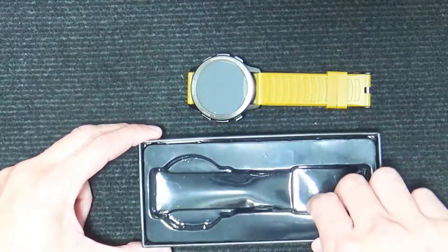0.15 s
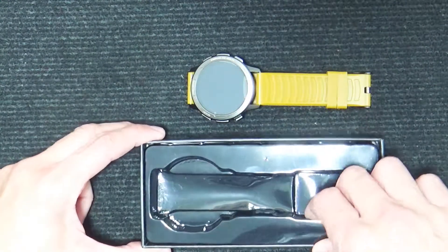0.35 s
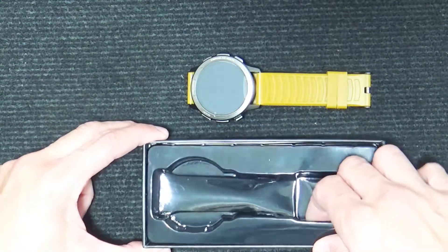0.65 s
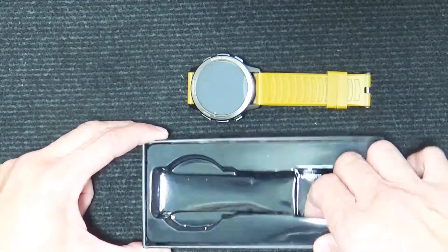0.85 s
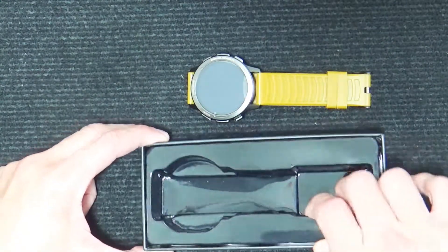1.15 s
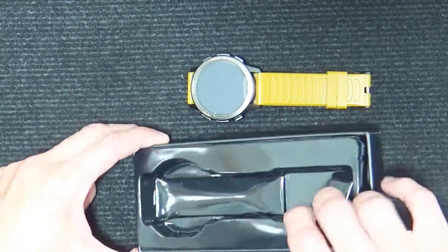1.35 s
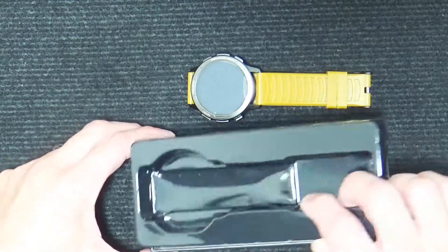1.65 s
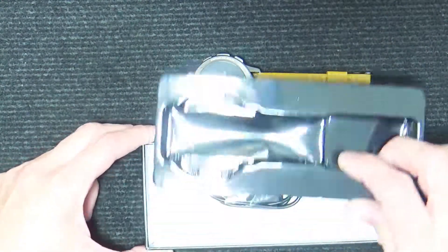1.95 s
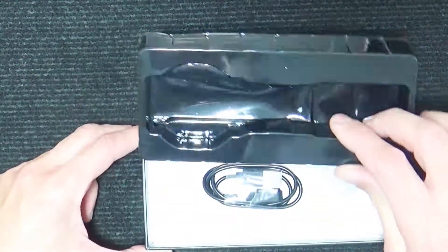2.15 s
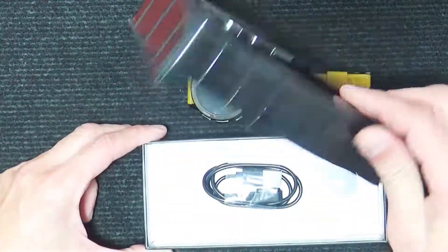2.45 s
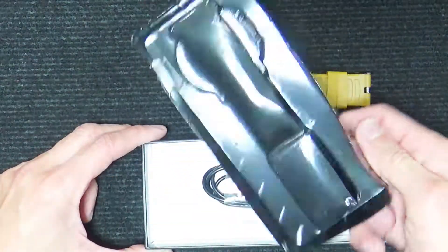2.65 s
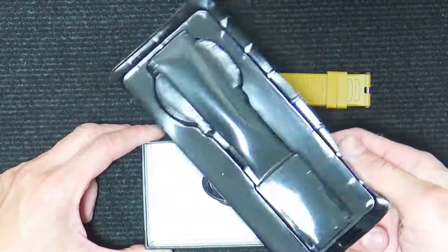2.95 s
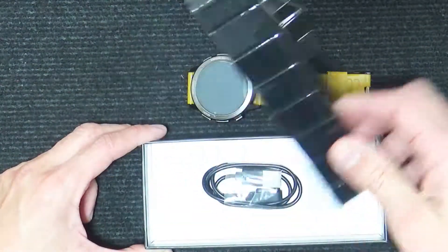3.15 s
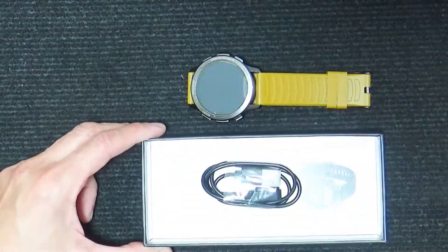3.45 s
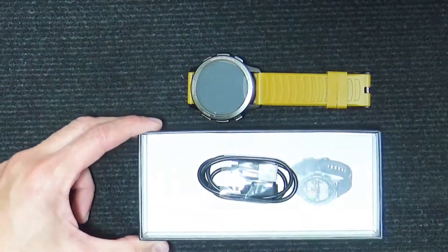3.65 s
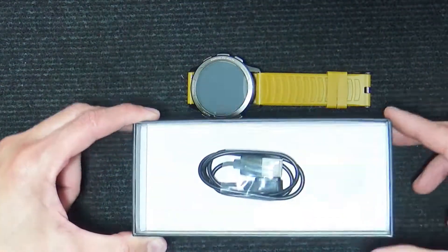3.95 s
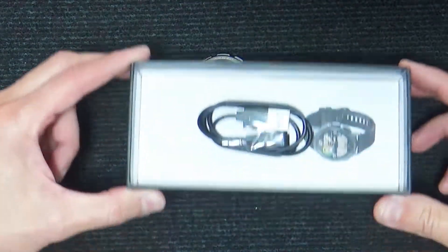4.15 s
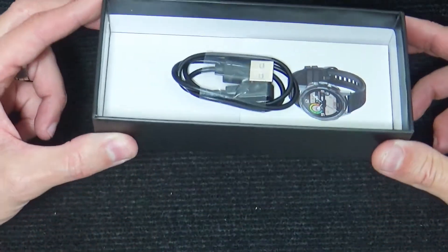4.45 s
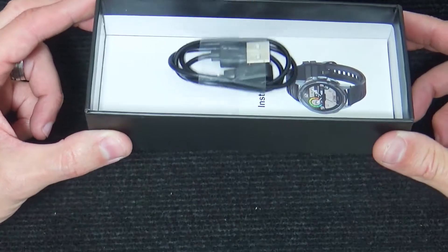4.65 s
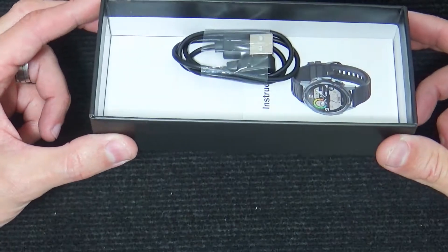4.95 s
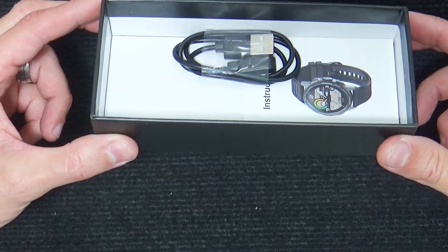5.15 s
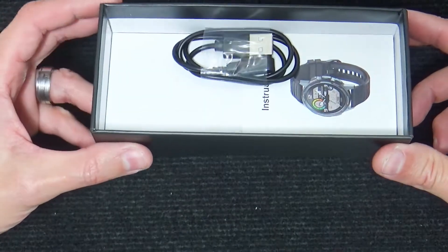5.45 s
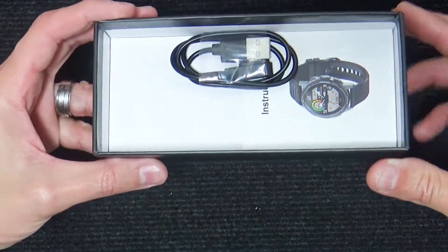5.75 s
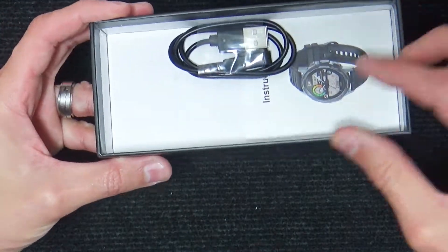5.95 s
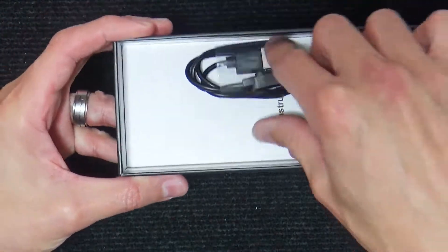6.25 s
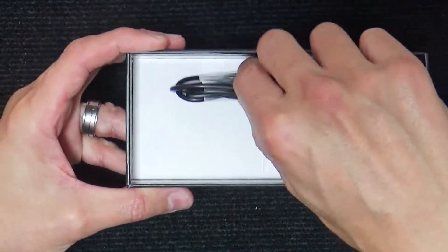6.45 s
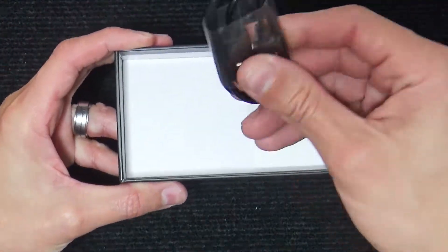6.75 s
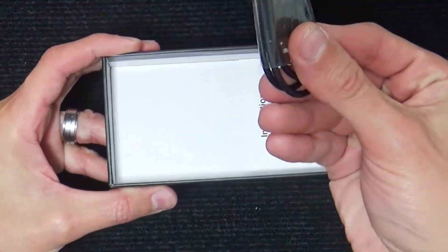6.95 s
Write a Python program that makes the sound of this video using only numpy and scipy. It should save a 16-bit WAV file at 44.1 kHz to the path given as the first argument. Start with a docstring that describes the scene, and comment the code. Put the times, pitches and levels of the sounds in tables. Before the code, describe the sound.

A close stereo microphone hears flimsy plastic crackling, groaning and rasping as it is worked out of a tight box, ending in several bright loud pops. After a pause the light tray lands with a brief double knock and scuff. Then come sparse, much quieter fingertip swishes, a tap on the box, a faint skin squeak, and a few crisp clicks of a cable, in a small, slightly lively room.

```python
"""In a small room, close to the microphone, a thin plastic tray is worked out of a cardboard box.
Filtered bursts make its buckling snaps; click trains and friction grains make its rim chatter and scrape.
It pops free and is dropped aside, ringing in a handful of decaying modes.
Then fingers slide over the box in filtered hiss and pick out a coiled cable with a few light clicks."""
import sys
import numpy as np
from scipy import signal
from scipy.io import wavfile
from scipy.ndimage import uniform_filter1d

SR = 44100
rng = np.random.default_rng(int(sys.argv[2]) if len(sys.argv) > 2 else 0)


def transcribe(u):
    """Save the signal u as a 16-bit wav file named by the first command-line argument.

    u: samples, shape (n,) or (channels, n), limited to [-1, 1]; the rate is SR.
    q: integer samples, one column per channel.
    """
    v = np.clip(np.atleast_2d(u).T, -1, 1)
    q = np.round(v * 32767).astype(np.int16)
    wavfile.write(sys.argv[1], SR, q)


N = 313551
TIME = np.arange(N) / SR

# a snap's colour is an arch over log frequency, centred here; also the middle pitch of the rim's patches
COLOUR_PIVOT_HZ = 2500
# a flipping patch's own resonance: its height, and its width as a share of its pitch
PATCH_DB, PATCH_WIDTH = 9.5, .2

# resonances of the open box: (frequency [Hz], width [Hz], rise [dB])
BOX = [(330, 120, 7.5), (1060, 490, 6), (3230, 1400, 11), (9170, 3700, 12)]
# modes of the whole tray: (frequency [Hz], relative level [dB], t60 [s])
TRAY_MODES = [(149, -22, .08), (320, -4.5, .13), (521, -4, .11), (561, -4, .11), (691, -2.5, .11),
              (799, -10, .09), (851, -6, .09), (1419, -9, .07)]
# spectrum of the groaning tray walls: (frequency [Hz], relative level [dB])
GROAN = [(60, -29.5), (150, -9), (320, 2.5), (600, 1), (1050, 2), (1600, -5), (2500, -2), (4000, -18.5),
         (9000, -50)]
# spectrum of the rasping tray rim: (frequency [Hz], relative level [dB])
RASP = [(200, -20.5), (1000, 5.5), (2800, 4.5), (5000, -0.5), (9000, 3), (12000, -5), (16000, -15.5)]
# level of the side sound, narrow in the lows and treble, widest in between: (frequency [Hz], level [dB])
SIDE_WIDTH = [(100, -26), (400, -14), (1400, -7), (5500, -7), (9000, -18.5), (14000, -26.5)]


def amp(db):
    """Decibels to gain."""
    return 10 ** (np.asarray(db) / 20)


def unit(x):
    """Scales to rms 1."""
    return x / np.sqrt(np.mean(x ** 2) + 1e-20)


def blow(x):
    """Scales a short sound to the energy of 5 ms at rms 1."""
    return x / np.sqrt(np.sum(x ** 2) / (.005 * SR) + 1e-20)


def read(points, hz):
    """Reads a spectrum table on a log-frequency axis."""
    f, value = np.transpose(points)
    return np.interp(np.log(hz + 1), np.log(f + 1), value)


def add(mix, s, sound):
    """Mixes a sound in at s seconds."""
    part = mix[max(round(s * SR), 0):][:len(sound)]
    part += sound[:len(part)]


def body(spectrum, peaks=(), size=4096):
    """Causal (minimum-phase) impulse response of a broad spectrum with resonances standing on it."""
    hz = np.fft.rfftfreq(size, 1 / SR)
    db = read(spectrum, hz)
    for f, width, rise in peaks:
        db = db + rise / (1 + ((hz - f) / (width / 2)) ** 2)
    log_gain = np.log(amp(np.r_[db, db[-2:0:-1]]))
    return np.fft.ifft(np.exp(np.conj(signal.hilbert(log_gain)))).real


def through(x, response):
    """Passes x through an impulse response."""
    return signal.fftconvolve(x, response)[:len(x)]


def ring(modes, size=16384):
    """A hollow body's answer to one blow; neighbouring modes swing in opposite directions."""
    t, out = np.arange(size) / SR, np.zeros(size)
    for k, (hz, db, t60) in enumerate(modes):
        out += (-1) ** k * amp(db - 60 * t / t60) * np.sin(2 * np.pi * hz * t)
    return out


def grains(per_s, spread_db):
    """Friction as tiny random slips of very unequal size."""
    size = amp(spread_db * np.minimum(rng.exponential(1, N), 4))
    happens = rng.random(N) < per_s / SR
    return rng.standard_normal(N) * size * happens


def burst(ring_s, slow_s, crack_s=0.00005, size=2048):
    """One flip: a brief, nearly white rattle whose low bending waves arrive late (slow_s at 1 kHz)."""
    t, hz = np.arange(size) / SR, np.fft.rfftfreq(size, 1 / SR)
    rattle = rng.standard_normal(size) * (1 - np.exp(-t / crack_s)) * np.exp(-t / ring_s)
    z = np.fft.rfft(rattle)
    z /= abs(z) ** .4  # evens out the spectrum
    bending_delay = np.exp(-4j * np.pi * slow_s * np.sqrt(1000 * hz))
    return np.fft.irfft(z * bending_delay)[:size // 2]


def clicks(rows, peaks, ring_s, slow_s, room_db, room_peaks):
    """Each flip sends a burst through the sheet and the patch's own resonance.
    Returns what goes to the microphone and what goes to the room, where the resonances
    of all directions partly even out. ring_s is for a patch at the colour pivot."""
    # spectrum of a snap: (frequency [Hz], relative level [dB])
    top = [(100, -18), (300, -2.5), (700, 7), (9500, 2.5), (12000, 1), (16000, -18.5)]
    low_shelf_db = -13.5  # how weakly a small patch radiates below its low edge
    ring_growth = 0.12  # exponent: bigger, lower patches rattle for longer
    near, far = np.zeros(N), np.zeros(N)
    hz = np.geomspace(50, 16000, 60)
    octave = np.log2(np.maximum(hz, 300) / COLOUR_PIVOT_HZ)
    low_cut = signal.butter(3, 220, "high", fs=SR, output="sos")
    for s, db, tilt_db, focus_db, patch_hz, edge_hz in rows:
        resonances = peaks + [(patch_hz, PATCH_WIDTH * patch_hz, PATCH_DB)]
        shelf = np.maximum(-10 * np.log10(1 + (edge_hz / hz) ** 10), low_shelf_db)
        # tilt makes it bright or dull, focus narrows it to one register
        colour = read(top, hz) + tilt_db * octave - focus_db * octave ** 2 + shelf
        colour = np.c_[hz, np.maximum(colour - colour.max(), -70)]
        patch_ring_s = ring_s * (COLOUR_PIVOT_HZ / patch_hz) ** ring_growth
        direct = through(body(colour, resonances), burst(patch_ring_s, slow_s))
        add(near, s, amp(db) * blow(signal.sosfilt(low_cut, direct)))
        evened = [(f, width, room_peaks * rise) for f, width, rise in resonances]
        add(far, s, amp(db + room_db) * blow(signal.sosfilt(low_cut, body(colour, evened))))
    return np.array([near, far])


def creaks(rows, width_hz, rough, edge=.5):
    """Uneven slips keep one resonance going while its pitch glides."""
    out = np.zeros(N)
    pole = np.exp(-np.pi * width_hz / SR)
    for start, end, first_hz, last_hz, db in rows:
        size = round((end - start) * SR)
        phase = 2 * np.pi * np.cumsum(np.geomspace(first_hz, last_hz, size)) / SR
        slow_noise = signal.lfilter([1], np.poly([pole, pole]), rng.standard_normal((2, SR // 4)))
        a, b = unit(slow_noise)[:, -size:]
        tone = (1 + rough * a) * np.cos(phase) + rough * b * np.sin(phase)
        add(out, start, amp(db) * unit(tone) * signal.windows.tukey(size, edge))
    return signal.sosfilt(signal.butter(4, 200, "high", fs=SR, output="sos"), out)


def floor():
    """Steady filtered hiss with the room's low resonances."""
    # spectrum of the hiss: (frequency [Hz], relative density [dB])
    hiss_colour = [(12, -39.5), (20, -8), (113, -3.5), (172, -8.5), (234, -3), (620, 1), (1060, -2.5),
                   (2460, -9), (3440, -10), (4180, -13), (14700, -18.5), (16000, -24)]
    # low resonances of the room: (frequency [Hz], width [Hz], rise [dB])
    hum = [(50, 15, 8), (132, 30, 10.5), (326, 11, 10)]
    return amp(-67.5) * unit(through(rng.standard_normal(N), body(hiss_colour, hum, size=16384)))


def rumble():
    """A faint low rumble of filtered noise under the handling."""
    # stronger while the tray is handled: (time [s], level [dB])
    levels = [(0, -65.5), (2.0, -69), (3.55, -67.5), (3.9, -73.5)]
    # spectrum: (frequency [Hz], relative level [dB])
    colour = [(15, -17), (50, -6), (110, -3.5), (170, -16), (240, -2.5), (330, -17), (600, -37)]
    noise = unit(through(rng.standard_normal(N), body(colour, size=16384)))
    return amp(np.interp(TIME, *np.transpose(levels))) * noise


def whine(start=2.15, end=3.3, hz=3450, width_hz=200, pulses_per_s=21, db=-75):
    """A very faint, high, fluttering whine in the background: narrow-band noise in pulses."""
    out = np.zeros(N)
    t = TIME[:round((end - start) * SR)]
    band = unit(signal.lfilter(*signal.iirpeak(hz, hz / width_hz, SR), rng.standard_normal(len(t))))
    flutter = .5 + .5 * np.sin(np.pi * pulses_per_s * t) ** 2
    add(out, start, amp(db) * band * flutter * signal.windows.tukey(len(t), .5))
    return out


def scatter(delay_s=0.0043, decay_s=0.013, size=2048):
    """Hands, box and table scatter a sound into a quick spray of small echoes."""
    age = np.arange(size) / SR - delay_s
    h = rng.standard_normal(size) * (age > 0) * np.exp(-abs(age) / decay_s)
    return h / np.linalg.norm(h)


def tail(build_s=0.0021, size=28000):
    """Dense reflections of a small room, each band dying at its own speed."""
    # decay: (frequency [Hz], t60 [s])
    t60 = [(150, 0.13), (600, 0.65), (3000, 0.55), (9000, 0.41), (15000, 0.7)]
    # colour of the reflections: (frequency [Hz], relative level [dB])
    colour = [(100, -6), (350, 7.5), (1000, -0.5), (5500, -1.5), (12000, -6), (16000, -9)]
    hz, t, z = signal.stft(rng.standard_normal(size), SR, nperseg=256)
    decay = amp(-60 * t / read(t60, hz)[:, None])
    h = signal.istft(z * decay, SR, nperseg=256)[1]
    h *= 1 - np.exp(-(np.arange(len(h)) / SR / build_s) ** 2)
    return through(h / np.linalg.norm(h), body(colour))


def room(x, wet_db=-7, scatter_db=-9.5):
    """Near echoes and a tail as mid and side; the spray and the mid tail drift steadily
    between two random sets, one turn a second."""
    turn = 2 * np.pi * TIME
    first, second = np.cos(turn) * x, np.sin(turn) * x
    early = amp(scatter_db) * (through(first, scatter()) + through(second, scatter()))
    add(early, .0031, amp(-11) * x)  # echo off the table
    mid = np.cos(turn) * through(x, tail()) + np.sin(turn) * through(x, tail())
    side = through(through(x, tail()), body(SIDE_WIDTH))
    return early + amp(wet_db) * mid, amp(wet_db) * side


def fingers(edge=0.27, pivot_hz=7000, uneven_db=0.8):
    """Skin hisses on card; inside the box the air under the hand colours the hiss and rises in pitch."""
    # fingertips slide on card: (start [s], end [s], level reached if the growth ran on for half a stroke
    # more [dB], growth over the stroke [dB], share inside the box [0-1], brightness [dB per octave])
    strokes = [(4.607, 4.754, -53.5, 12.5, 0.03, -5), (5.316, 5.463, -65, 4.5, 0.1, -7.5),
               (5.537, 5.685, -59, 8, 0, -7), (5.917, 6.005, -56, 7, 0.8, -8.5),
               (6.128, 6.286, -64, 0.5, 0.7, -4), (6.317, 6.46, -53, 15, 0.1, -7.5),
               (6.486, 6.552, -49, 16, 0.3, 8)]
    # spectrum of skin on card: (frequency [Hz], relative level [dB])
    skin_colour = [(300, -50), (1500, -22.5), (3100, -2.5), (4500, -6.5), (7000, 4), (9500, 9.5),
                   (12500, -0.5), (16000, -25)]
    # air between hand and box, at mid-stroke and fully inside: (frequency [Hz], width [Hz], rise [dB])
    hollow = [(2500, 330, 10), (4550, 244, 9), (6440, 350, 12), (11100, 250, 12)]
    hollow_rise = .13  # share by which the air's pitch rises over a stroke as the gap closes
    grip = unit(uniform_filter1d(rng.standard_normal(N), size=500))
    friction = grains(per_s=29000, spread_db=4.5) * amp(uneven_db * grip)
    out = np.zeros(N)
    for start, end, db, growth_db, inside, tilt_db in strokes:
        skin = [(hz, level + tilt_db * np.log2(hz / pivot_hz)) for hz, level in skin_colour]
        x = friction[round(start * SR):round(end * SR)]
        progress, hiss = np.linspace(0, 1, len(x)), np.zeros(len(x))
        # cross-fade through six stages of the closing gap
        places, step = np.linspace(0, 1, 6, retstep=True)
        for place in places:
            bend = 1 + hollow_rise * (place - .5)
            air = [(hz * bend, width, inside * rise) for hz, width, rise in hollow]
            hiss += through(x, body(skin, air)) * np.maximum(1 - abs(progress - place) / step, 0)
        level = amp(db + growth_db * (progress - 1.5))
        add(out, start, unit(hiss) * level * signal.windows.tukey(len(x), edge))
    return out


def finger_squeaks():
    """A fingertip squeaks faintly on the card, its slips driving a gliding resonance very unevenly."""
    # (start [s], end [s], first pitch [Hz], last pitch [Hz], level [dB])
    squeaks = [(4.14, 4.27, 2670, 2820, -73), (5.94, 6.0, 2450, 2470, -70), (6.12, 6.34, 2630, 2980, -67)]
    return creaks(squeaks, width_hz=350, rough=1.0)


def box_taps():
    """Fingers tap the box: each tap clicks and leaves the box ringing briefly."""
    # (time [s], level [dB], tilt [dB per octave], focus [dB per octave squared],
    #  patch pitch [Hz], low edge [Hz], ring of the box [dB])
    taps = [(4.622, -56.5, -4.5, -0.53, 2560, 198, -62), (4.749, -39.5, -3.5, -1.04, 2820, 1900, -55.5),
            (6.268, -42, -2.5, -0.53, 960, 280, -56.5)]
    # modes of the box: (frequency [Hz], relative level [dB], t60 [s])
    modes = [(255, -7, .1), (328, -1, .11), (2980, -1, .06), (3340, -5, .1)]
    ringing = np.zeros(N)
    for s, *_, ring_db in taps:
        add(ringing, s, amp(ring_db) * ring(modes))
    rows = [row[:-1] for row in taps]
    return ringing + clicks(rows, BOX, ring_s=0.00067, slow_s=0.00098, room_db=-1, room_peaks=0.8)


def cable_clicks():
    """The cable and its plugs click as they are picked up, coloured by the open box."""
    # (time [s], level [dB], tilt [dB per octave], focus [dB per octave squared],
    #  patch pitch [Hz], low edge [Hz])
    rows = [(6.4045, -47.5, -8, 1.8, 1280, 260), (6.4436, -33.5, 0, 0.45, 1280, 920),
            (6.492, -52.5, -1, -0.5, 2600, 1520), (6.7022, -37, 0.5, -1.7, 7500, 1400),
            (6.7155, -39, 3, -0.24, 4380, 1760)]
    return clicks(rows, BOX, ring_s=0.0014, slow_s=0.00054, room_db=-1, room_peaks=0.22)


def landing(scuff_s=0.0079, thud_db=-7, size=2048):
    """The dropped tray rings, thuds and scuffs the cloth at each contact."""
    # the tray lands, rocks and settles: (time [s], ring [dB], scuff [dB])
    landings = [(3.488, -43, -45), (3.4955, -39.5, -41.5), (3.503, -48.5, -48), (3.513, -47.5, -69),
                (3.6105, -62, -52.5), (3.620, -52.5, -51), (3.637, -69, -55)]
    out, t = np.zeros(N), np.arange(size) / SR
    for s, ring_db, scuff_db in landings:
        contact = rng.standard_normal(size) * np.exp(-t / scuff_s)
        scuff = blow(through(contact, body(RASP)))
        thud = blow(through(contact, body(GROAN)))
        add(out, s, amp(ring_db) * ring(TRAY_MODES))
        add(out, s, amp(scuff_db) * (scuff + amp(thud_db) * thud))
    return out


def pressure(start, end, growth_db):
    """One stroke: it takes hold quickly, swells or slackens, and lets go."""
    attack_s, release_s = 0.013, 0.015
    attack = np.clip((TIME - start) / attack_s, 0, 1)
    release = np.exp(-np.maximum(TIME - end, 0) / release_s)
    return attack * amp(np.interp(TIME, [start, end], [-growth_db, 0])) * release


def crinkles(per_s=120, spread_db=4, peak_db=14, count=220):
    """A run of tiny, uneven flips while the tray is bent, each in a patch with a pitch of its own."""
    low_hz, high_hz = 540, 2670  # range of pitch
    out, now = np.zeros(N), 0
    for gap, place, strong in rng.random((count, 3)):
        now += (.2 + 1.6 * gap) / per_s
        hz = low_hz * (high_hz / low_hz) ** place
        patch = body(GROAN, [(hz, PATCH_WIDTH * hz, peak_db)])
        flip = through(patch, burst(ring_s=.0005, slow_s=.0003))
        add(out, now, amp(spread_db * (2 * strong - 2.5)) * blow(flip))
    return out


def drag(ring_db=-7, groan_db=-6, rasp_db=-2, crinkle_db=-2):
    """Friction grains shake the tray's walls and rasp at its rim, and the bent sheet crinkles."""
    # the tray rubs on the box, then in the hand: (start [s], end [s], final drive of its walls [dB],
    # final drive of its rim [dB], growth over the stroke [dB])
    strokes = [(0.066, 0.196, -42, -78, 8), (0.24, 0.407, -54, -59, 8.5), (0.604, 0.925, -55, -59.5, -2),
               (0.915, 1.124, -50, -54, -4.5), (1.195, 1.403, -50.5, -52.5, 5),
               (1.4, 1.473, -55, -32.5, 9.5), (1.444, 1.644, -43.5, -55.5, -4.5),
               (2.04, 2.766, -67, -70, 1.5), (2.483, 2.526, -72, -57, 5), (3.011, 3.242, -71, -72.5, -4.5)]
    wall, rim = np.zeros(N), np.zeros(N)
    for start, end, wall_db, rim_db, growth_db in strokes:
        stroke = pressure(start, end, growth_db)
        wall = np.maximum(wall, amp(wall_db) * stroke)
        rim = np.maximum(rim, amp(rim_db) * stroke)
    push = unit(grains(per_s=610, spread_db=3.0)) * wall
    scratch = unit(grains(per_s=5000, spread_db=1.5)) * rim
    out = amp(crinkle_db) * wall * crinkles()
    paths = [(push, body(GROAN), groan_db), (push, ring(TRAY_MODES), ring_db),
             (scratch, body(RASP), rasp_db)]
    for x, h, db in paths:
        out = out + amp(db) * through(x, h / np.linalg.norm(h))
    return out


def wall_creaks():
    """A tray wall creaks as it flexes, a slightly rough resonance with its pitch bending."""
    # (start [s], end [s], first pitch [Hz], last pitch [Hz], level [dB])
    rows = [(.695, 0.75, 653, 701, -50), (.838, 0.859, 445, 322, -49), (.862, 0.897, 546, 726, -48),
            (1.372, 1.438, 427, 492, -48.5), (1.466, 1.503, 545, 770, -39.5)]
    return creaks(rows, width_hz=200, rough=.35)


def chatter(jitter=0.082, spread_db=1.5, size=512):
    """The rim catches and lets go in a nearly regular train of clicks, each on another patch,
    or gives a single short scuff."""
    # the rim sticks and slips on the card, one list a pull: (time [s], rate [slips per s], level [dB])
    pulls = [
        [(.953, 84, -49), (.98, 124, -48), (1.03, 146, -43.5), (1.10, 126, -51.5), (1.132, 75, -47.5)],
        [(1.208, 78, -48.5), (1.24, 68, -50), (1.262, 170, -48.5), (1.29, 160, -47), (1.318, 200, -49.5)],
    ]
    # single scuffs of the rim on the card: (time [s], level [dB])
    scuffs = [(.379, -51.5), (.395, -54), (.6122, -49.5), (.628, -48), (0.844, -51.5), (.8545, -55),
              (.874, -46.5)]
    # spectrum of a slip: (frequency [Hz], relative level [dB])
    slip_colour = [(200, -20.5), (600, 0.5), (1300, -0.5), (2400, 3.5), (3800, -6), (5000, 2), (6000, -1),
                   (7600, 7), (8700, 1), (10800, 6.5), (13000, -7.5), (16000, -19)]
    slip_ring_s, scuff_s = .0009, .0012
    out, t = np.zeros(N), np.arange(size) / SR
    for pull in pulls:
        s, rate, db = np.transpose(pull)
        now = s[0]
        for late, strong, octaves, *noise in rng.standard_normal((40, size + 3)):
            if now > s[-1]:
                break
            hz = COLOUR_PIVOT_HZ * 2 ** octaves
            patch = body(slip_colour, [(hz, PATCH_WIDTH * hz, PATCH_DB)])
            slip = blow(through(noise * np.exp(-t / slip_ring_s), patch))
            add(out, now, amp(np.interp(now, s, db) + spread_db * strong) * slip)
            now += np.exp(jitter * late) / np.interp(now, s, rate)
    for s, db in scuffs:
        rub = rng.standard_normal(size) * t * np.exp(-t / scuff_s)
        add(out, s, amp(db) * blow(through(rub, body(slip_colour))))
    return out


def tray_snaps():
    """The tray buckles or is knocked: patches of its thin sheet flip with sharp snaps."""
    # (time [s], level [dB], tilt [dB per octave], focus [dB per octave squared],
    #  pitch of the patch that flips [Hz], low edge [Hz])
    snaps = [(.0046, -31.5, -1, 0, 5340, 1930), (.0437, -37.5, -5.5, 2.5, 3780, 2450),
             (.0762, -32.5, -1, 2, 3350, 850), (.1028, -32.5, -9.5, 2.4, 1900, 620),
             (.1417, -35, -8.5, 2.7, 950, 754), (.1577, -37.5, -7, 0.5, 1020, 650),
             (.1691, -28, -1, 0.8, 915, 456), (.1956, -35, -2, 2, 2900, 800),
             (.2652, -31.5, -0.3, 0.7, 3250, 604), (.4694, -28.5, -3, -0.4, 2180, 1150),
             (.6528, -41, -6, 0, 2100, 900), (.6838, -36, -1, -4.5, 7200, 1050),
             (.6878, -29, -3, 1.7, 2070, 745), (.7748, -40.5, -2, -1, 1870, 990),
             (.7835, -36, -21.5, 10, 1840, 716), (.8, -40.5, -20, 7.5, 1890, 815),
             (.8641, -34.5, -12.5, 4.5, 1910, 595), (.9037, -47, 0, 1.5, 2950, 1810),
             (.9201, -28.5, -2, -0.8, 1976, 1326), (1.1829, -46, -1.5, 1.5, 7877, 595.7),
             (1.1882, -40, -0.5, -2, 467.3, 251), (1.375, -36.5, -9, -0.5, 1325, 694.5),
             (1.4533, -30, -2, 1.8, 1786, 701), (1.4575, -30, -6, 0, 1059, 200),
             (1.462, -34, -5.5, 0, 2100, 300), (1.4735, -29.5, 4.2, -3.8, 8530, 400),
             (1.4793, -24.5, -1.5, -0.73, 3666, 400), (1.486, -33, -9, -0.7, 641, 178.6),
             (1.508, -33, -7, 2.5, 1822, 547.3), (1.5264, -22, -8.5, 0.75, 1557, 1053),
             (1.5773, -30.5, -5.5, 1.5, 1448, 1100), (1.604, -39, -10, 2, 1055, 700),
             (1.636, -36, -5, -1, 2840, 600), (1.6778, -17, -5.5, 0.8, 2493, 998),
             (1.7979, -19, 0, -1.1, 6780, 750), (1.8143, -19.5, 2, 0, 6440, 3000),
             (2.0209, -44.5, -9, 1, 1026, 880), (3.3718, -38, -9.5, 3.5, 1460, 325)]
    # the thin sheet's short resonances: (frequency [Hz], width [Hz], rise [dB])
    sheet = [(950, 130, 6), (1500, 720, -3), (2190, 620, 3), (3560, 480, 7), (4800, 580, 3.5),
             (7150, 600, 6.5), (8780, 1700, 9.5)]
    return clicks(snaps, sheet, ring_s=0.0016, slow_s=.0006, room_db=2.0, room_peaks=0.9)


def scene(chatter_room_db=1, drag_room_db=-1, landing_room_db=-2.0, finger_room_db=-2,
          floor_side_db=-5, lean=0.018, port_lag=.08):
    """All sources in the room, heard by a closely spaced stereo microphone whose left port
    is a fraction of a sample nearer."""
    near, far = tray_snaps() + box_taps() + cable_clicks()
    tray = drag() + wall_creaks()
    hands = fingers() + finger_squeaks()
    sends = [(chatter(), chatter_room_db), (tray, drag_room_db),
             (landing(), landing_room_db), (hands, finger_room_db)]
    for sound, room_db in sends:
        near = near + sound
        far = far + amp(room_db) * sound
    mid, side = room(far)
    mid = mid + near + floor() + rumble() + whine()
    side = side + lean * near + port_lag * np.gradient(near)  # left a little louder and earlier
    side = side + amp(floor_side_db) * through(floor(), body(SIDE_WIDTH))
    return np.array([mid + side, mid - side])


def record(dry):
    """The recorder's band limit, a steep low-pass at 16.2 kHz."""
    low_pass = signal.firwin(255, 16200, window=("kaiser", 9), fs=SR)
    return signal.oaconvolve(dry, low_pass[None], "same")


dry = scene()
out = record(dry)
transcribe(out)
```